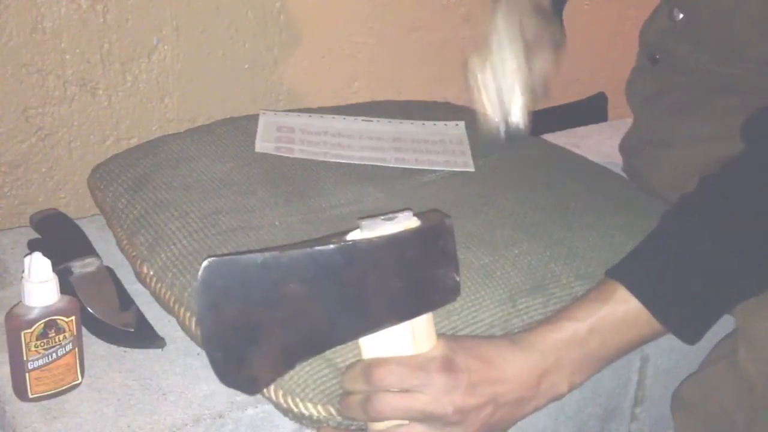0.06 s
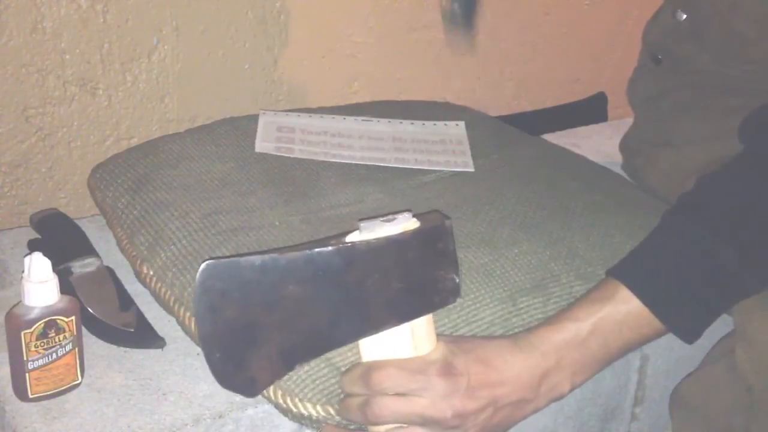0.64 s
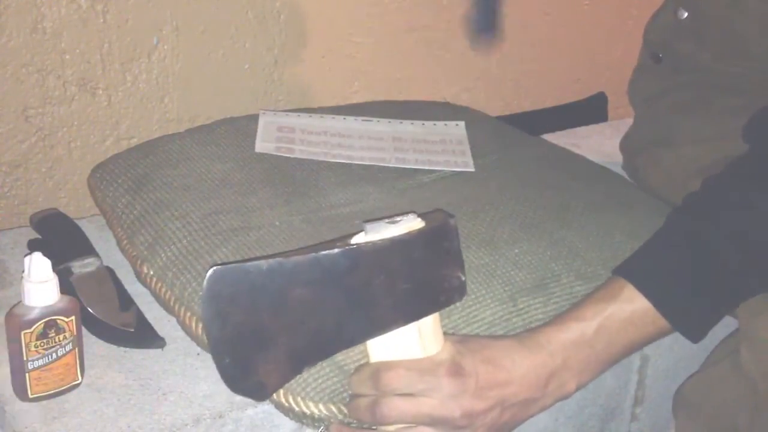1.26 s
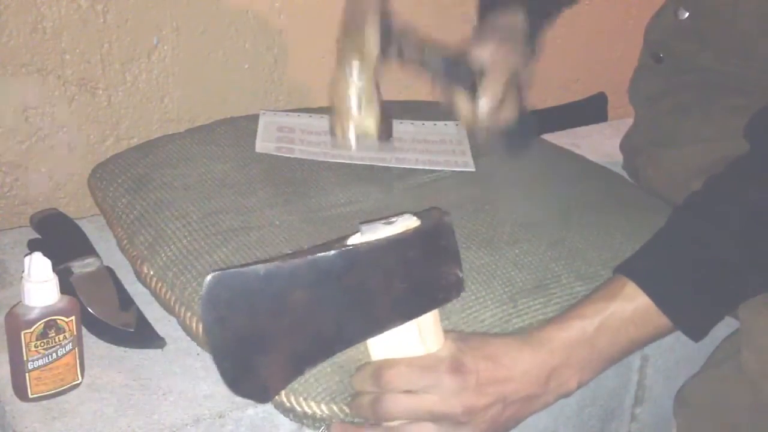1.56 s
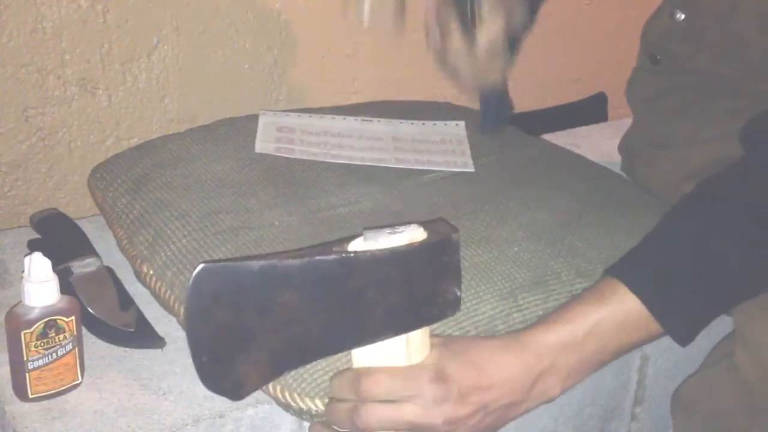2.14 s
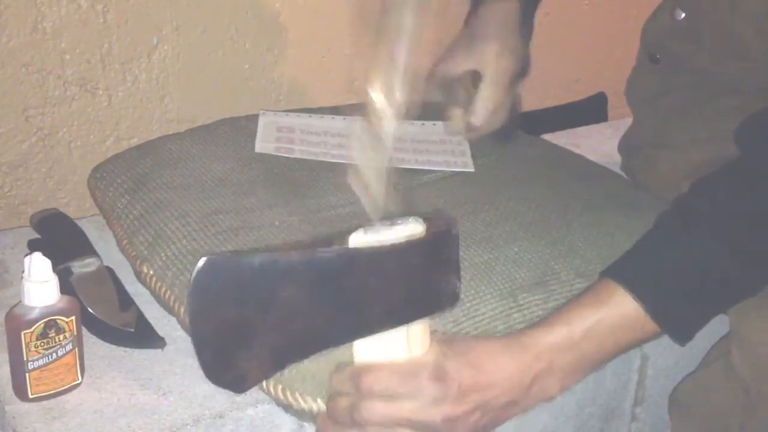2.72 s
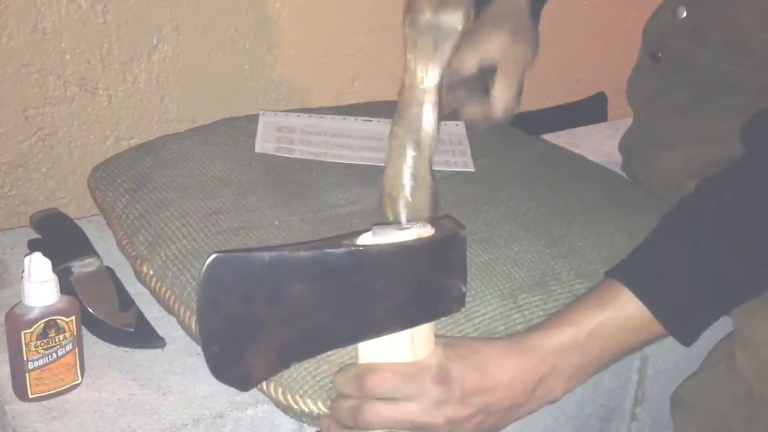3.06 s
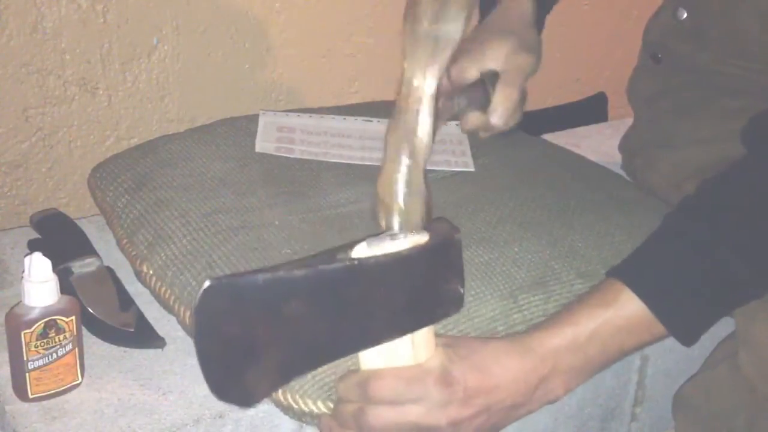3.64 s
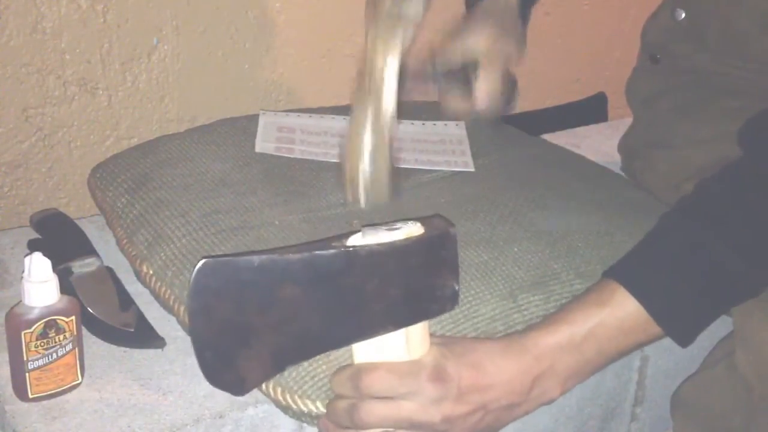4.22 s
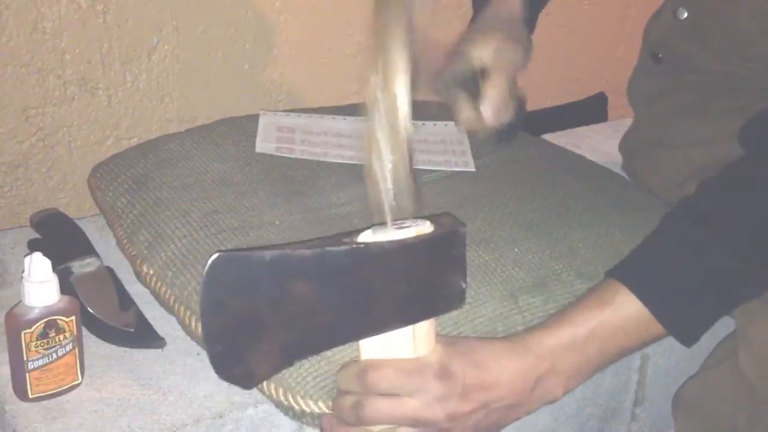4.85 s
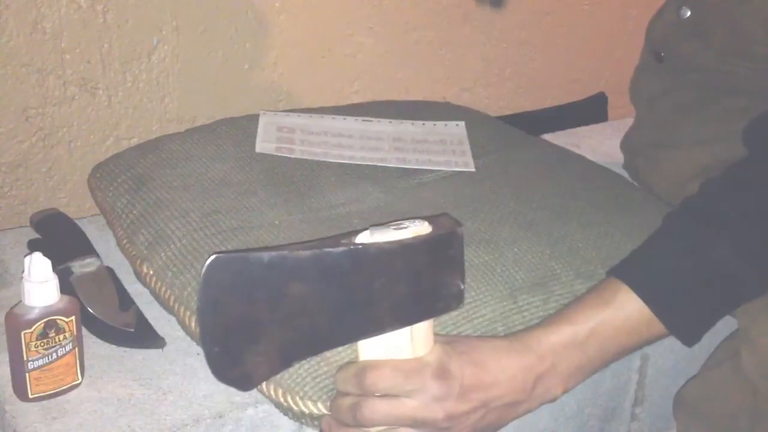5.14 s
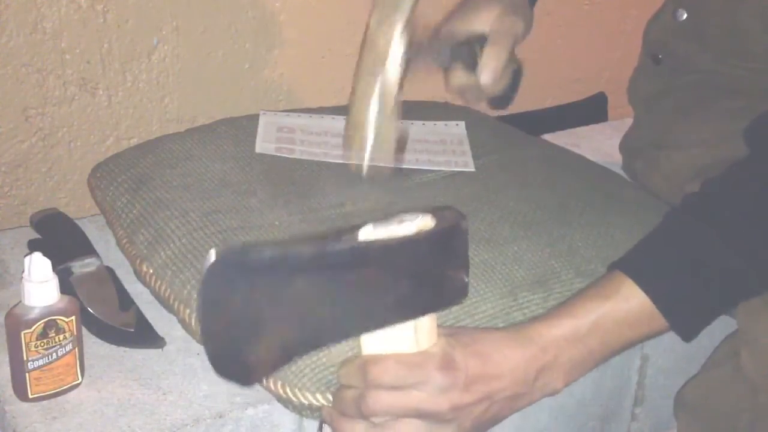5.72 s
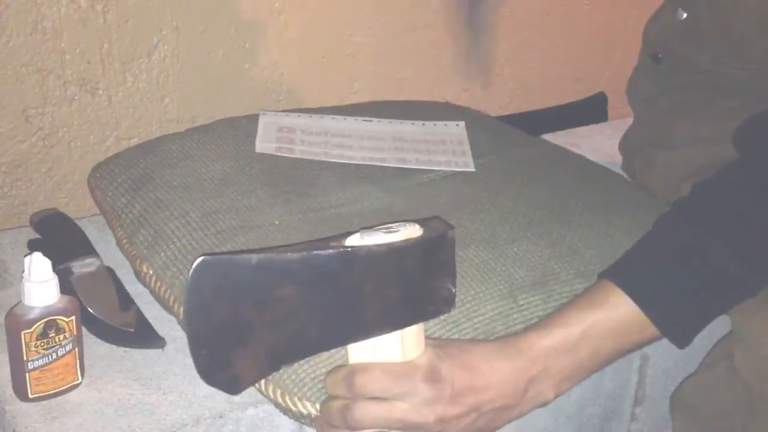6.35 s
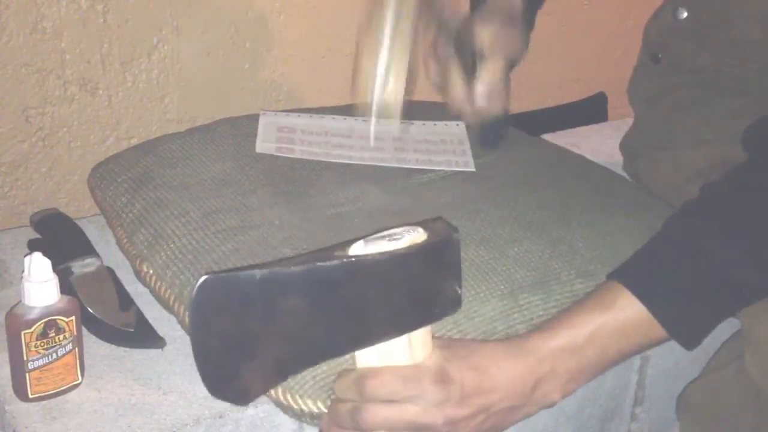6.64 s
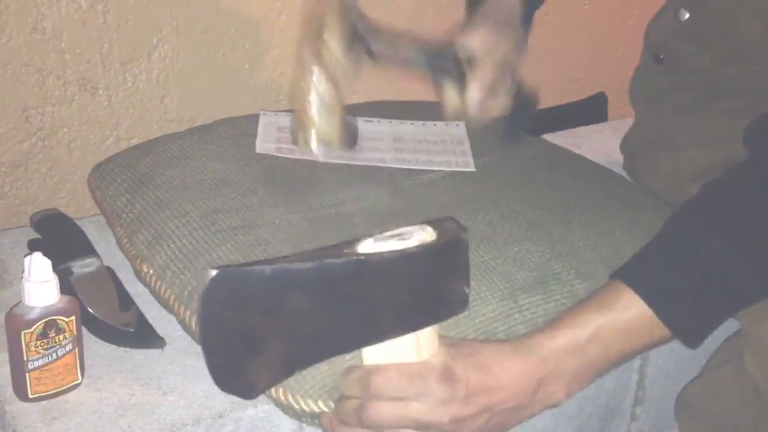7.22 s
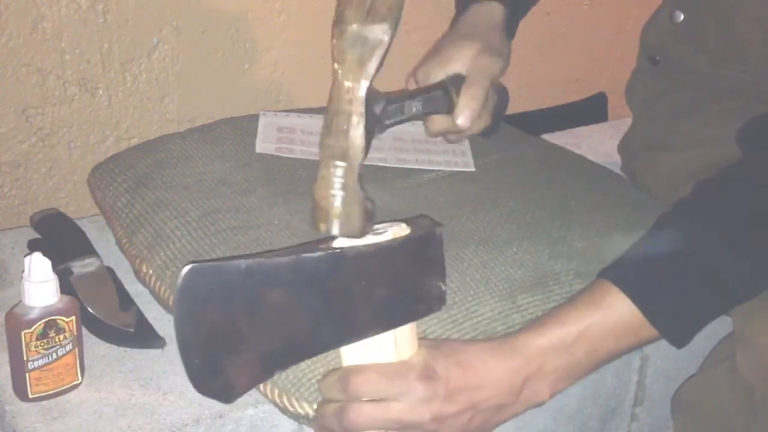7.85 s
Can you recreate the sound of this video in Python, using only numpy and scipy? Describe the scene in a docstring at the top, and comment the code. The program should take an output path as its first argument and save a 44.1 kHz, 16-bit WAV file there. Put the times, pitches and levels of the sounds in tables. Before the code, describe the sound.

Close hammering on a metal wedge in an axe handle, sharp strikes and softer taps with short steel rings, over faint workshop hum.

```python
"""A hammer drives a steel wedge into the top of a wooden axe handle, close by in a small workshop.
Heavy blows alternate with light taps: each cracks, thumps down the handle into the bench and the room,
and sets the steel ringing. Between blows the handle knocks as it is shifted and a sleeve rustles.
Behind the work lie room noise and a faint motor hum, which dip at each heavy blow and creep back.
Heard in mono, as from one fixed microphone at the bench."""
import sys
import numpy as np
from scipy import signal
from scipy.fft import rfft, irfft
from scipy.io import wavfile

SR = 44100
rng = np.random.default_rng(int(sys.argv[2]) if len(sys.argv) > 2 else 0)


def materialize(psi):
    """Save the field psi as 16-bit PCM at rate SR to the path in sys.argv[1].

    A 1-D psi becomes a single channel; in a 2-D psi each row is a channel.
    """
    bounded = np.clip(np.atleast_2d(psi).T, -1, 1)
    quanta = np.round(bounded * 32767).astype(np.int16)
    wavfile.write(sys.argv[1], SR, quanta)


N = 347508
TIME = np.arange(N) / SR
TAIL = TIME[:SR // 2]   # the half second that one contact sounds for

# Hammer blows at the bench: (time [s], strength [dB], hardness [dB/octave], ring of the axe eye [dB],
# aim, blade over cheeks [dB], squeak pitch [Hz], squeak lift [dB])
HAMMER_BLOWS = [ (0.3697, 26.5, -1.5, -25.5, 7, 1130, 7.5), (0.804, 32.5, -0.85, -26.5, 24.5, 1841, 5.5),
                (1.0722, 21.5, -0.1, -30.5, -5, 2430, 2.1), (1.545, 28.7, 0, -24.5, 20, 13040, 6),
                (1.785, 8.5, -3, -41.5, 6.5, 950, 4), (2.1904, -3.5, 0.36, -77, 4, 1700, 10.5),
                (2.32, 17.5, -1, -28, 17, 1150, 10), (2.771, 30.5, 0.26, -30.5, 8.5, 11900, 7),
                (3.0333, 17.5, -0.53, -37, -5, 2760, 2.5), (3.4957, 32.5, -0.1, -25.5, 5.5, 3560, 6.3),
                (3.6962, 12.5, -3, -53, -2.5, 1034, 4.5), (4.2025, 21, 2.7, -34.5, -16, 2670, 7.6),
                (4.656, 32, -0.77, -22, -10.5, 12970, 11.7), (4.9166, 22, 1, -20, -18.5, 2702, 9.8),
                (5.3799, 32, -1.24, -39, -12, 1400, 8.7), (5.6041, 14, -2.5, -34.5, 19, 1170, 10),
                (6.0181, 21, 1, -31.5, -11, 2684, 9.6), (6.4789, 33.5, 0, -35, -2, 3900, 2),
                (6.748, 23.5, -0.3, -15, -8.5, 3820, 8.5), (7.2118, 30, 0.53, -13.5, 0, 883, 7.4),
                (7.4358, 14, -2, -31, 5, 913, 3.2), (7.8775, 20.5, -1.3, -41, -22, 2400, 2.7)]
# Dull knocks of the handle as it is shifted: (time [s], strength [dB])
HANDLE_KNOCKS = [(4.095, 9.5), (5.9934, 11.5), (7.751, 9)]
# Points at which a contact's colour, its spectrum, is given: (frequency [Hz])
COLOUR_POINTS_HZ = [280, 700, 1550, 2750, 6200, 12000]
# Colour of a rebounding tap, a driving blow and a handle knock at those points: (level [dB])
TAP_DB = [1, -7, -9, -9.5, -19, -25.5]
DRIVE_DB = [-1, -10, -6, -14, -14.5, -18]
KNOCK_DB = [2, -22.5, -18.5, -33, -57.5, -58]


def contacts(knock_hz, knock_lift_db):
    """Time, colour and squeak of each blow, then of each hollow knock; a softer contact loses treble."""
    times, db, hardness, _, _, squeak_hz, squeak_db = np.transpose(HAMMER_BLOWS)
    octaves = np.maximum(np.log2(np.array(COLOUR_POINTS_HZ) / COLOUR_POINTS_HZ[1]), 0)
    colours = db[:, None] + np.outer(1 - slip(db), TAP_DB) + np.outer(slip(db), DRIVE_DB)
    colours += np.outer(hardness, octaves)
    blows = zip(times, colours, squeak_hz, squeak_db)
    knocks = [(at, level + np.array(KNOCK_DB), knock_hz, knock_lift_db) for at, level in HANDLE_KNOCKS]
    return [np.array(column) for column in zip(*blows, *knocks)]


def slip(strength_db, gives_db=26.5, driven_db=27.5):
    """How far a blow drives the wedge: 0 for a rebound, 1 for a full bite."""
    return np.clip((strength_db - gives_db) / (driven_db - gives_db), 0, 1)


def hammering(thump_db):
    """Every contact cracks, clanks, snaps and thumps; the hammer's blows also ring axe head and wedge."""
    times, colours, squeak_hz, squeak_db = contacts(knock_hz=775, knock_lift_db=16.5)
    sounds = impact(colours, squeak_hz, squeak_db, crack_s=.0027, build_s=.0023, scatter_db=3.54)
    sounds += clank(colours, clank_db=-12, t60=.053, scatter_db=7.5, count=56)
    sounds += snap(colours[:, -2:].mean(axis=1), snap_db=-12.5, t60=.005)
    sounds += from_db(colours[:, 0] + thump_db)[:, None] * thump(swell_s=.0049, low_hz=89)
    sounds[:len(HAMMER_BLOWS)] += ringing(treble_db=colours[:len(HAMMER_BLOWS), -1])
    out = np.zeros(N + len(TAIL))
    for at, sound in zip(times, sounds):
        start = round(at * SR)
        out[start:start + len(TAIL)] += sound
    return out[:N]


# Spectrum that all contacts share on top of their own colour: (frequency [Hz], level [dB])
SHARED_SPECTRUM = [(30, -30.5), (75, -33.5), (130, -18), (250, -6.5), (450, -7), (700, -1.5), (1400, -5),
                   (2100, -2.5), (3600, 2), (5000, -2.5), (7000, -5.5), (10000, 3.5), (14500, 1.5),
                   (16000, -9)]
# Direct crack against the room's tail, at the microphone: (frequency [Hz], energy ratio [dB])
DIRECT_TO_ROOM = [(40, 15), (200, -7), (700, -0.5), (1500, 3), (2800, 6.5), (6000, 2), (13000, 5.5)]
# Reverberation of the small workshop: (frequency [Hz], t60 [s])
ROOM_DECAY = [(50, 0.17), (250, 0.38), (700, 0.27), (1800, .25), (5000, 0.23), (9000, .21), (14000, 0.15)]


def impact(colours, squeak_hz, squeak_db, crack_s, build_s, scatter_db):
    """Steel bites into wood for a few ms, differently each time; the room answers with a fixed tail."""
    edges = band_edges(20, 16500, count=56)
    centres = np.sqrt(edges[1:] * edges[:-1])
    early = TAIL[:SR // 16]
    bite = np.tile(np.exp(-(early / crack_s) ** 2), (len(colours), 1))
    uneven_db = scatter_db * rng.standard_normal((len(colours), len(centres)))
    tail_gains, tails, cracks = [], [], 0
    for k, hz in enumerate(centres):
        # steel slipping in wood squeaks in one narrow band
        lift_db = squeak_db * np.exp(-((np.sqrt(hz) - np.sqrt(squeak_hz)) / 3.7) ** 2)
        direct = from_db(at_hz(DIRECT_TO_ROOM, hz))
        gain = from_db(contact_db(colours, hz) + lift_db + uneven_db[:, k]) / np.hypot(1, direct)
        reflections = dying(at_hz(ROOM_DECAY, hz)) * (1 - np.exp(-TAIL / build_s))
        tail_gains.append(gain * from_db(-lift_db / 2))   # the squeak belongs mostly to the crack
        tails.append(band_burst(reflections, edges[k], edges[k + 1]))
        cracks = cracks + gain[:, None] * direct * band_burst(bite, edges[k], edges[k + 1])
    room = np.transpose(tail_gains) @ np.array(tails)
    return room + np.pad(cracks, ((0, 0), (0, len(TAIL) - len(early))))


def contact_db(colours, hz):
    """Each contact's level at hz: its own colour plus the shared spectrum."""
    own_db = np.array([np.interp(np.log(hz), np.log(COLOUR_POINTS_HZ), colour) for colour in colours])
    return own_db + at_hz(SHARED_SPECTRUM, hz)


def clank(colours, clank_db, t60, scatter_db, count):
    """Many weak, quickly damped modes of head and handle; every contact picks out its own few."""
    edges = band_edges(700, 14500, count)
    pitches = rng.uniform(edges[:-1], edges[1:])
    tones = unit_energy(dying(t60) * np.sin(2 * np.pi * pitches[:, None] * TAIL))
    share = np.sqrt(np.diff(edges) / (SR / 2)) * rng.choice([-1, 1], count)
    uneven_db = scatter_db * rng.uniform(-1, 1, (len(colours), count))
    return (share * from_db(contact_db(colours, pitches) + clank_db + uneven_db)) @ tones


def snap(levels_db, snap_db, t60):
    """The first touch of steel on steel: a bright click about a millisecond long."""
    touch = np.tile(dying(t60), (len(levels_db), 1))
    return from_db(levels_db + snap_db)[:, None] * band_burst(touch, low_hz=2500, high_hz=15000)


# Low resonances of handle, bench and room: (frequency [Hz], level [dB], t60 [s])
LOW_MODES = [(87, -10, .4), (133, -7, .35), (164, -4, .22), (184, -1, .22), (229, 7, .22), (260, -2, .2),
             (318, 5, .22), (377, 3, .2), (463, 2, .26), (508, -2, .26), (570, -4, .22), (618, -4, .22),
             (668, -8, .22), (822, -8, .2)]


def thump(swell_s, low_hz):
    """Neighbouring low modes start in opposite senses, so the thump swells just after the crack."""
    modes = 0
    for k, (hz, db, t60) in enumerate(LOW_MODES):
        height = from_db(db) * 2 * np.log(1000) / (t60 * SR)
        modes = modes + (-1) ** k * height * dying(t60) * np.cos(2 * np.pi * hz * TAIL)
    bass_cut = signal.butter(4, low_hz, "high", fs=SR, output="sos")   # the thump carries little deep bass
    return signal.sosfilt(bass_cut, modes * (1 - np.exp(-TAIL / swell_s)))


# Steel ringing near the microphone: the axe's blade, cheeks, whole head and eye, and the wedge:
# (frequency [Hz], level [dB], t60 [s])
BLADE_MODES = [(1099, -2, .21), (1155, -2, .24), (1230, -6, .21), (1302, -2, .19), (4400, -20, .16)]
CHEEK_MODES = [(2353, 0, .19), (2718, -1, .21), (2815, -4, .21)]
HEAD_OVERTONES = [(5520, -19, .2), (5609, -18, .25), (5700, -20, .18), (8465, -28, .24), (9260, -22, .22)]
EYE_MODES = [(3680, -1.5, .11), (3709, -1.5, .22), (3790, -11, .15), (6660, -24, .17)]
WEDGE_MODES = [(1310, -5, .2), (1384, -4, .26), (1833, -6, .15), (6645, -7, .19), (10520, -12, .15),
               (11805, -7, .26), (11831, -1, .3), (13138, -2, .08)]


def ringing(treble_db, head_ring_db=-53.5, wedge_ring_db=-51, handover_db=13.5):
    """Rebounds ring the head, split between blade and cheeks by the aim; a driven wedge takes over."""
    _, db, _, eye_db, aim_db, _, _ = np.transpose(HAMMER_BLOWS)
    head_db = db + head_ring_db - handover_db * slip(db)
    cheeks_db = head_db - 20 * np.log10(np.hypot(1, from_db(aim_db)))
    wedge_db = treble_db + wedge_ring_db + handover_db * slip(db) ** 2
    faces = steel(BLADE_MODES, cheeks_db + aim_db) + steel(CHEEK_MODES, cheeks_db)
    head = faces + steel(HEAD_OVERTONES, head_db) + steel(EYE_MODES, eye_db)
    return head + steel(WEDGE_MODES, wedge_db)


def steel(modes, levels_db, scatter_db=1.0, waver=.24, flutter_hz=60):
    """Each blow lands elsewhere and rings the modes with new strengths; reflections make them waver."""
    out = 0
    low_pass = signal.butter(2, flutter_hz, fs=SR, output="sos")
    for hz, db, t60 in modes:
        flutter = signal.sosfilt(low_pass, rng.standard_normal((2, len(TAIL))))
        swell, lag = waver * flutter / flutter.std()
        phase = 2 * np.pi * hz * TAIL
        tone = unit_energy(dying(t60) * ((1 + swell) * np.sin(phase) + lag * np.cos(phase)))
        tone *= np.linalg.norm(dying(t60) * np.sin(phase))   # same energy as without the waver
        strengths = from_db(levels_db + db + scatter_db * rng.standard_normal(len(levels_db)))
        out = out + strengths[:, None] * tone
    return out


# Sleeve and grip, faint between the blows: (time [s], half length [s], level [dB])
SLEEVE_BRUSHES = [(0.615, .015, -73), (1.937, 0.092, -77.5), (2.066, 0.055, -82.5), (2.615, 0.061, -76),
                  (4.483, 0.012, -74), (4.61, 0.023, -69)]


def rustle(low_hz, high_hz):
    """Cloth brushes softly as the arm moves."""
    band = signal.butter(1, [low_hz, high_hz], "band", fs=SR, output="sos")
    hiss = signal.sosfilt(band, rng.standard_normal(N))
    brushes = sum(from_db(db) * np.exp(-((TIME - at) / half) ** 2) for at, half, db in SLEEVE_BRUSHES)
    return hiss / hiss.std() * brushes


# Room tone of the workshop: (frequency [Hz], relative spectral density [dB])
ROOM_TONE = [(20, -38), (52, -24), (78, -6.5), (102, -13.5), (135, -4), (150, -4), (270, 0.5), (520, 0),
             (800, -6.5), (1200, -10.5), (2000, -12.5), (5000, -24.5), (9500, -32.5), (15000, -30.5)]
# A motor in the background: (frequency [Hz], relative level [dB])
MOTOR_LINES = [(382, -69.5), (461.5, -57), (921, -74.5), (1168, -79), (1335, -78)]


def workshop(hum_db):
    """Dull room noise and a motor's hum sink and swell together."""
    hz = np.maximum(np.fft.rfftfreq(N, 1 / SR), 1)
    air = irfft(rfft(rng.standard_normal(N)) * from_db(at_hz(ROOM_TONE, hz)), N)
    level_db = background_db(full_db=-59.5, dip_db=6.5, recover_s=1.3, head_start_s=.41)
    hum = 0
    for line_hz, db in MOTOR_LINES:
        hum = hum + from_db(db) * np.sqrt(2) * np.sin(2 * np.pi * (line_hz * TIME + rng.random()))
    return from_db(level_db) * air / air.std() + from_db(hum_db + level_db - level_db.mean()) * hum


def background_db(full_db, dip_db, recover_s, head_start_s):
    """The background dips at each heavy blow and comes back steadily; it opens part of the way back."""
    since_blow = TIME + head_start_s
    for at, db, *_ in HAMMER_BLOWS:
        if slip(db) > .5:
            since_blow = np.where(TIME >= at, TIME - at, since_blow)
    return full_db - dip_db * np.maximum(1 - since_blow / recover_s, 0)


def from_db(db):
    """Decibels to gain."""
    return 10 ** (np.asarray(db) / 20)


def at_hz(points, hz):
    """Read a table on a log-frequency axis."""
    pitch, value = np.transpose(points)
    return np.interp(np.log(hz), np.log(pitch), value)


def dying(t60):
    """An envelope that falls 60 dB in t60 seconds."""
    return np.exp(-np.log(1000) * TAIL / t60)


def unit_energy(x):
    """Scale each row to energy 1."""
    return x / np.sqrt(np.sum(x ** 2, axis=-1, keepdims=True) + 1e-20)


def band_edges(low_hz, high_hz, count):
    """Edges of bands that widen towards the treble."""
    return np.linspace(low_hz ** .5, high_hz ** .5, count + 1) ** 2


def band_burst(envelope, low_hz, high_hz):
    """A burst of noise in one band, carrying that band's share of a unit click's energy."""
    band = signal.butter(2, [low_hz, high_hz], "band", fs=SR, output="sos")
    burst = signal.sosfilt(band, envelope * rng.standard_normal(envelope.shape) + 1e-18)
    return unit_energy(burst) * np.sqrt((high_hz - low_hz) / (SR / 2))


def scene():
    """The hammering up close, the workshop behind it, in one channel."""
    return (hammering(thump_db=1.0) + workshop(hum_db=-3.5) + rustle(low_hz=2950, high_hz=7450))[None]


def record(dry):
    """The microphone chain rounds the loudest peaks and cuts the highest treble."""
    ceiling, cutoff_hz = .55, 15300
    rounded = ceiling * np.tanh(dry / ceiling)
    return signal.sosfilt(signal.ellip(12, .2, 100, cutoff_hz, fs=SR, output="sos"), rounded)


dry = scene()
out = record(dry)
materialize(out)
```